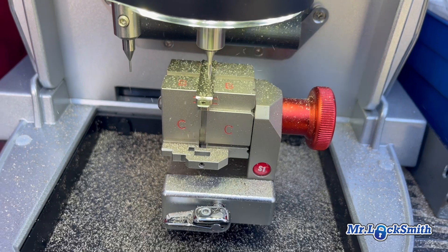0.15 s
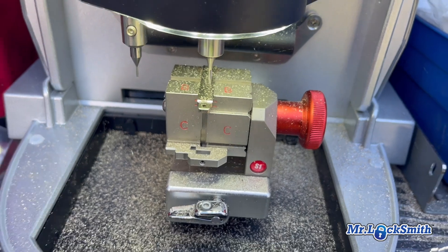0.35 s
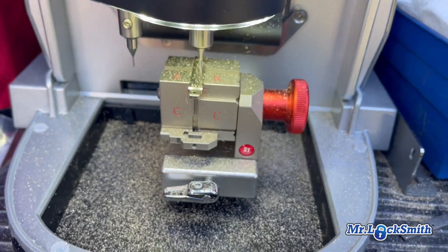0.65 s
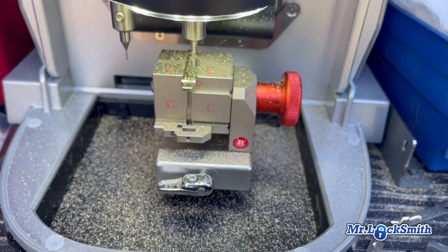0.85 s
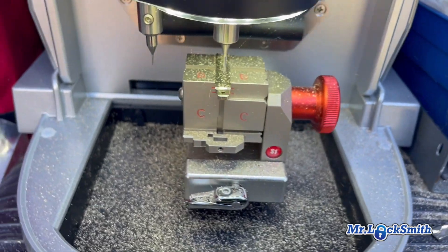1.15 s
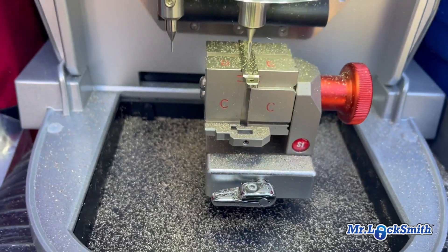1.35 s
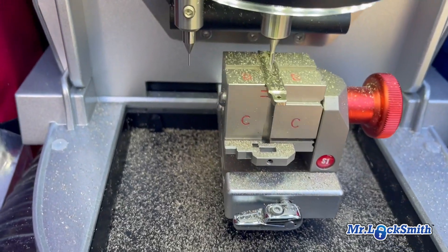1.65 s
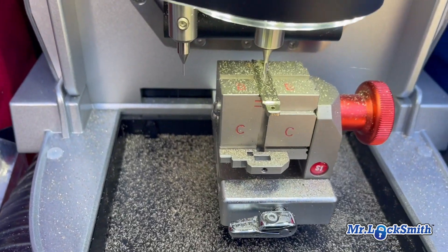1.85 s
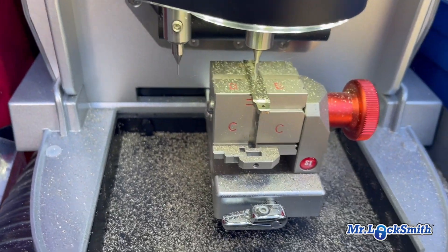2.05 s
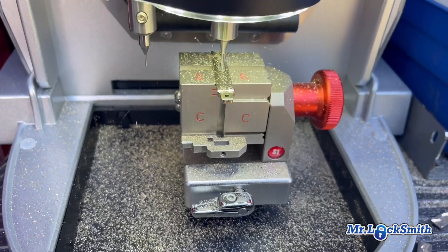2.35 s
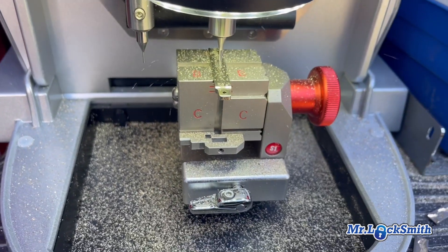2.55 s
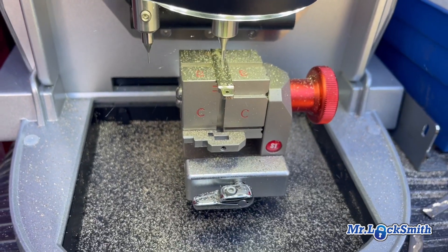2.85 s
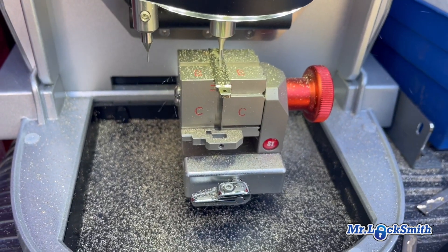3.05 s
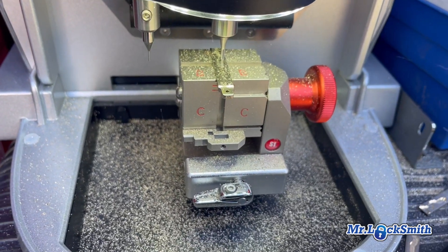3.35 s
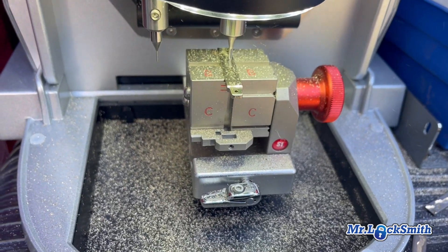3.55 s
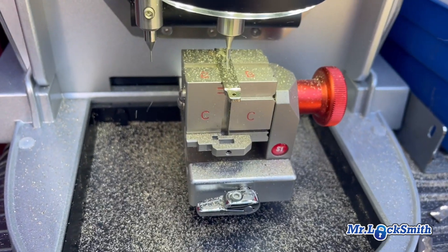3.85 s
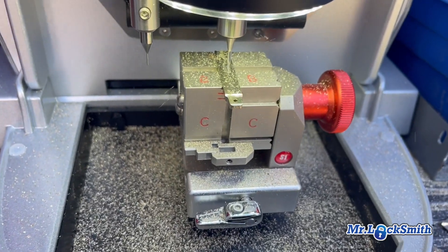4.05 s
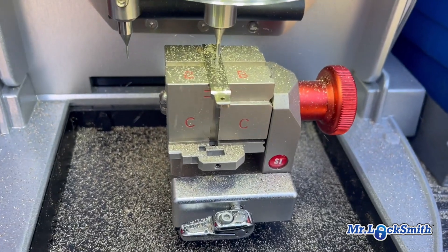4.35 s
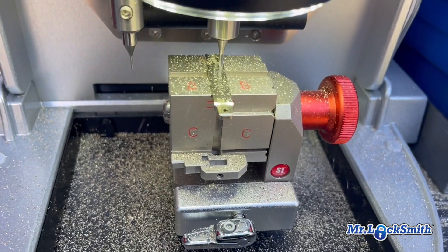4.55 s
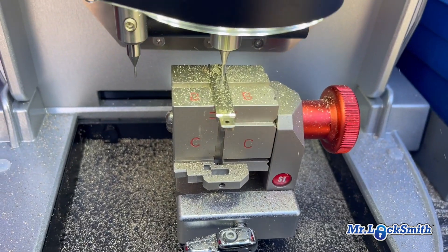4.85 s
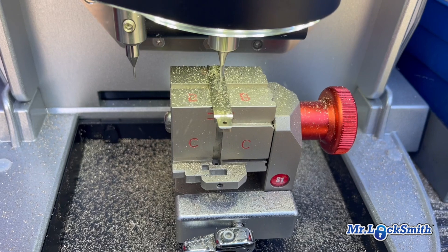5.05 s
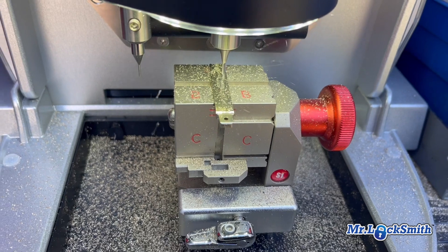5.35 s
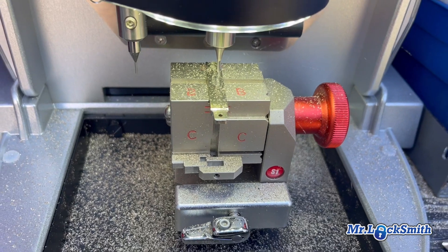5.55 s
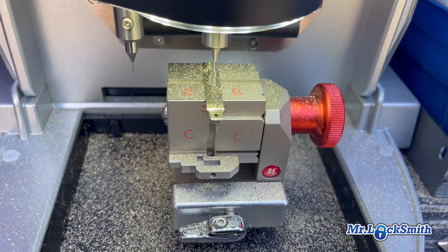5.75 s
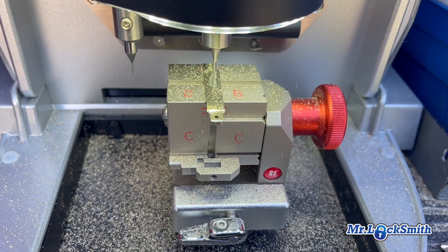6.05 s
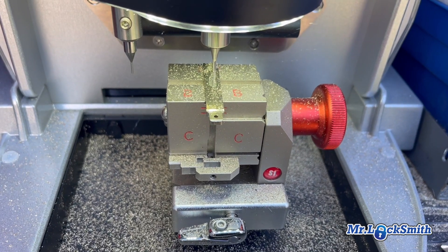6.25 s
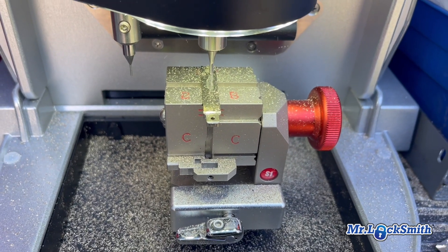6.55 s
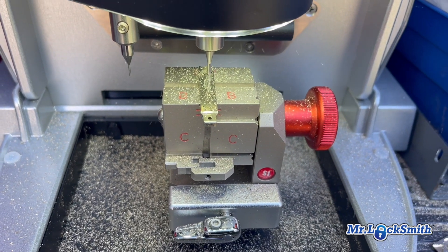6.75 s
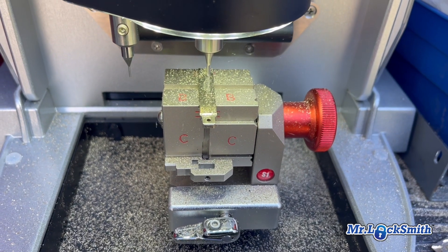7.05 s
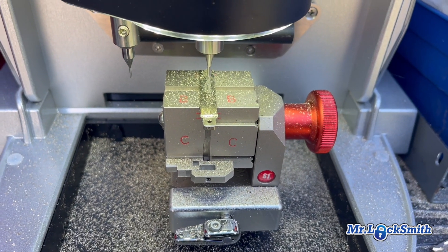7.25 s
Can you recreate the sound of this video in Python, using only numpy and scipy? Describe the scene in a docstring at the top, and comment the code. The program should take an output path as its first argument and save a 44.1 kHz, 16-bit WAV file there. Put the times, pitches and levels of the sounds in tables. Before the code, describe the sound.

A small milling machine whines steadily while its feed motors hum in changing pitches, cutting a brass key with a fine hiss of chips.

```python
"""Inside the plastic housing of a small milling machine a brass key is cut, heard by two hand-held microphones.
The spindle sings in multiples of its turning rate. The stepper motors that feed the clamp hum at a pitch set by
each move, and their shake mixes with the cutter into sum and difference tones. Chips hiss, swelling once and
more weakly twice a turn, over a rush of noise in the housing. A fan hums low and the carriage knocks."""
import sys
import numpy as np
from scipy import signal
from scipy.fft import rfft, irfft, next_fast_len
from scipy.io import wavfile
from scipy.ndimage import uniform_filter1d, map_coordinates

SR = 44100
rng = np.random.default_rng(int(sys.argv[2]) if len(sys.argv) > 2 else 0)


def materialize(psi):
    """Save the field psi as 16-bit PCM at rate SR to the path in sys.argv[1].

    A 1-D psi becomes a single channel; in a 2-D psi each row is a channel.
    """
    bounded = np.clip(np.atleast_2d(psi).T, -1, 1)
    quanta = np.round(bounded * 32767).astype(np.int16)
    wavfile.write(sys.argv[1], SR, quanta)


N = 326781

# feed moves: [start t/s, kind: 0 fast, 1 slow, 2 middle]
MOVES = [(0.05, 0), (0.52, 0), (1.049, 0), (1.55, 0), (2.04, 1), (2.55, 1), (3.03, 0), (3.67, 2),
         (4.579, 0), (5.45, 1), (6.0, 1), (6.432, 0), (7.07, 1)]
# step cycle rate of fast, slow and middle moves: [f/Hz]
STEP_HZ = [83.97, 66.73, 79.45]
# load of each move, in the order of MOVES: [hum level/dB, low mixed tones level/dB, high mixed tones level/dB]
MOVE_LOAD = [(-1, -0.5, -0.5), (-2, -0.5, -2), (-1, -0.5, -.5), (0, -2.5, -3.5), (-0.5, 0.5, -1),
             (0, 1.5, 3.5), (-0.5, -1.5, 0.5), (-0.5, 2, -1.5), (.5, 0, 1.5), (0, 1, 1), (0, 0.5, 0),
             (0, -2, 1.5), (.5, 2, 0.5)]
# chips build up along a move and drop as it turns: [t/s, chip level/dB, lowest range over it level/dB]
CHIP_LEVELS = [(0, 2.5, 1.5), (.5, -0.5, 2.5), (1.55, -1, 1), (1.96, -4.5, 2), (2.17, -1, -0.5),
               (2.9, 5.5, -2), (3.0, 4.5, -2), (3.14, -1.5, 1.5), (3.55, -2, 1), (4.46, 4.5, -1),
               (4.75, 1.5, 1), (5.41, 2, 0.5), (5.45, -1, 2), (6.38, -3.5, 5.5), (6.44, 0.5, 2.5),
               (7.04, 1.5, 0), (7.09, -1, 3), (7.41, -1, 4)]


def amp(db):
    """Gain of a level in dB."""
    return 10 ** (np.asarray(db) / 20)


def unit(x):
    """Scaled to rms 1."""
    return x / np.sqrt(np.mean(x ** 2) + 1e-20)


def along(points, hz):
    """Value at hz, read from (Hz, value) points on a log frequency axis."""
    f, v = np.transpose(points)
    return np.interp(np.log(np.abs(hz) + 1), np.log(f + 1), v)


def curves(rows):
    """One value per sample for each column after the time."""
    times, *columns = np.transpose(rows)
    return [np.interp(np.arange(N) / SR, times, column) for column in columns]


def wobble(rate):
    """A random curve of straight segments, rate knots a second."""
    knots = rng.standard_normal(int(N * rate / SR) + 4)
    return map_coordinates(knots, [np.arange(N) * rate / SR], order=1)


def filtered(x, response):
    """x shaped by a response of frequency."""
    size = next_fast_len(N + 8192)
    spectrum = rfft(x, size) * response(np.fft.rfftfreq(size, 1 / SR))
    return irfft(spectrum, size)[..., :N]


def left_right(mid, side):
    """Two channels from their mean and half difference."""
    return np.array([mid + side, mid - side])


def panned(pair, pan_db):
    """Shifted towards the left by pan_db, with the two gains averaging 1."""
    gain = amp(np.array([pan_db / 2, -pan_db / 2]))
    return pair * gain / gain.mean(0)


def turning(hz):
    """Angle of a shaft that turns at hz."""
    return 2 * np.pi * np.cumsum(hz) / SR


def lag(angle):
    """The housing sets higher tones back more in phase; tones that lie close keep step and beat together."""
    mean_khz = angle[-1] / (2 * np.pi * N / SR) / 1000
    return angle - 13 * mean_khz ** 2


def gait(move):
    """0, 1 or 2 for a fast, slow or middle move."""
    return np.transpose(MOVES)[1].astype(int)[move]


def feed():
    """Step cycle angle, the move at each sample, and a gain that sags while the motor changes speed."""
    starts = np.transpose(MOVES)[0]
    move = np.clip(np.searchsorted(starts, np.arange(N) / SR) - 1, 0, None)
    # the motor takes 33 ms to reach a new speed
    speed = uniform_filter1d(np.array(STEP_HZ)[gait(move)], int(0.033 * SR))
    change = np.abs(np.gradient(speed)) * SR  # Hz per second
    sag = amp(-.02 * uniform_filter1d(change, size=400))
    start_angle = 0.081  # radians
    return turning(speed) + start_angle, move, sag


def spindle(shaft, shake):
    """Each multiple reaches the two microphones by its own path; the feed shakes the weak ones."""
    # the loudest multiples drift as the clamp travels and step when a move turns:
    # [t/s, multiples 1, 3, 4, 5, 6 level/dB]
    loudest = [(0, -32, -34, -34, -24, -31), (.5, -28, -33.5, -29.5, -23, -30),
               (.7, -34, -34.5, -29.5, -31.5, -32.5), (1.2, -40, -34, -27.5, -27.5, -28.5),
               (1.65, -45, -32.5, -27.5, -35, -30), (2.0, -35, -32.5, -30, -43, -31),
               (2.3, -36, -30.5, -29.5, -29.5, -28), (2.95, -30, -32, -26.5, -32.5, -26),
               (3.1, -31, -36, -30, -30, -27.5), (3.62, -45, -34.5, -34, -30, -30.5),
               (3.8, -32, -31, -35, -31.5, -26), (4.4, -48, -34.5, -34.5, -27, -23),
               (4.55, -29.5, -35, -23.5, -30, -23), (5.38, -27.5, -34.5, -24, -27.5, -24),
               (5.5, -26, -43, -27, -27, -27), (6.1, -26.5, -42.5, -27.5, -31, -25.5),
               (6.38, -29.5, -42, -26, -28.5, -33), (6.48, -30, -39, -23, -31, -23),
               (7.03, -29.5, -33.5, -27.5, -30.5, -23.5), (7.12, -26, -46, -26, -30, -25),
               (7.41, -28, -41, -27, -31.5, -25)]
    # slower changes: [t/s, multiples 2, 7, 9, 10, 12, 17 level/dB]
    slower = [(0, -41.5, -35.5, -41.5, -62, -51, -44.5), (1.0, -43, -42, -41.5, -51, -55, -57),
              (1.5, -40.5, -43, -39, -59, -49, -54), (2.05, -44, -38, -52, -71, -51, -67),
              (2.6, -49.5, -37.5, -42, -47, -53, -54), (3.45, -43, -39, -52, -43, -67, -62),
              (4.0, -46, -43, -41, -44.5, -49, -49.5), (4.6, -41, -35, -45, -41.5, -59, -49),
              (5.3, -41.5, -36.5, -44, -40.5, -68.5, -50.5), (6.2, -41, -41.5, -45.5, -44.5, -61, -48),
              (7.0, -41.5, -36.5, -45, -39.5, -61, -50), (7.41, -41.5, -38, -42, -47, -50, -47)]
    # multiples of the turning rate, in the order of those columns: [multiple]
    strong = [1, 3, 4, 5, 6, 2, 7, 9, 10, 12, 17]
    # how wide each strong multiple sounds: [side minus mid level/dB]
    strong_side_db = [-19, -13.5, -16.5, -14, -23.5, -23, -33.5, -3, -4.5, -10, -2.5]
    # place of two strong multiples: [t/s, left minus right of multiple 4 level/dB, of multiple 5 level/dB]
    places = [(0, -13, -1), (.25, -10, -1), (1.25, -14, 0), (1.55, 4, -6), (2.0, 6, -5), (2.3, -2, -6),
              (2.75, 1, -11), (3.6, -6, -11), (4.2, 12, -6), (4.5, 2.5, -8), (5.4, 3, -3.5),
              (7.41, 4.5, -5)]
    # brief dips of one multiple: [centre t/s, multiple, half length t/s, depth level/dB]
    fades = [(0.365, 5, 0.04, 11), (1.5, 4, 0.17, 35), (1.982, 6, 0.039, 3), (2.09, 4, 0.061, 9),
             (2.38, 1, .03, 18), (6.28, 3, 0.089, 2), (6.317, 4, 0.058, 32), (6.406, 1, 0.018, 4),
             (6.574, 4, 0.089, 17)]
    # weak multiples, which come and go: [multiple, mid level/dB, side level/dB]
    weak = [(8, -52, -74), (11, -53, -55), (13, -57, -50), (14, -56.5, -48), (18, -56.5, -52.5),
            (19, -59.5, -63), (20, -72, -60), (21, -64.5, -62), (22, -74, -56), (24, -66.5, -62),
            (25, -55.5, -67), (27, -58, -71), (28, -56, -73), (29, -72, -73.5), (31, -71.5, -66),
            (32, -58.5, -58.5), (36, -73, -58.5), (47, -70, -64.5)]
    weak_growth = 0.2  # dB gained in the mid per dB of chip level

    t = np.arange(N) / SR
    chips_db = curves(CHIP_LEVELS)[0]
    levels = curves(loudest) + curves(slower)
    pans = dict(zip([4, 5], curves(places)))
    out = np.zeros((2, N))
    for k, db, side_db in zip(strong, levels, strong_side_db):
        angle = lag(k * shaft) + 0.02 * wobble(40)
        pair = left_right(np.sin(angle), -amp(side_db) * np.cos(angle))
        dips_db = sum(depth_db * np.exp(-((t - centre) / half) ** 2)
                      for centre, which, half, depth_db in fades if round(which) == k)
        flutter_db = .5 * wobble(12)
        out += amp(db - dips_db + flutter_db) * panned(pair, pans.get(k, 0 * db))
    for k, mid_db, side_db in weak:
        angle = lag(round(k) * shaft) + 0.058 * wobble(30)
        flutter_db = 2.2 * wobble(2.614) + 2.7 * wobble(8)
        mid = amp(mid_db + weak_growth * chips_db + flutter_db) * np.sin(angle)
        side = amp(side_db + 1.8 * wobble(2.6)) * np.cos(angle)
        out += left_right(mid, side) * (1 + 0.29 * shake)
    return np.sqrt(2) * out  # table levels are rms


def stepper(steps, move, sag):
    """The motor hums in multiples of its step cycle, at the strengths of each kind of move."""
    # hum, one row each for fast, slow and middle moves: [step multiples 2 to 7 level/dB]
    hum_db = [(-33.5, -20.5, -38.5, -52, -59, -58), (-47.5, -26, -27.5, -40.5, -48, -51),
              (-44.5, -18.5, -33.5, -39.5, -47, -63)]
    kind = gait(move)
    load_db = np.transpose(MOVE_LOAD)[0][move]
    hum = np.zeros(N)
    for k, db in enumerate(np.transpose(hum_db), start=2):
        level = uniform_filter1d(amp(db)[kind], size=900)
        hum += level * np.sin(lag(k * steps) - 2.1)
    # the driver's small steps whine far above the hum
    hum += amp(-58.0 + 1.5 * wobble(9.5)) * np.sin(48 * steps)
    load_gain = amp(uniform_filter1d(load_db, size=4000) + 0.16 * wobble(8.8))
    return np.sqrt(2) * load_gain * sag * hum


def mixing(shaft, steps, move):
    """The clamp shakes against the flutes: tones at sums and differences of both rates, coloured by the housing."""
    # mixed tones: [spindle multiple, step multiple added to it]
    pairs = [(k, m) for k, ms in [(1, [1, 2, 3, 4, 5]), (2, [-3, 1, 2, 3, 4]),
             (3, [-3, -2, -1, 2, 3, 4, 5, 6]), (4, [-4, -3, -1, 1, 2, 3, 4, 5, 6]),
             (5, [-3, -2, 1, 2, 3, 4]), (6, [-3, -2, -1, 1, 3]), (7, [-5, -4, -3, -2]), (8, [-5, 2, 3]),
             (9, [-4, 2, 3]), (10, [-5, 2, 3]), (11, [-3])] for m in ms]
    # shake of the clamp, one row each for fast, slow and middle moves: [step multiples 1 to 6 level/dB]
    clamp_db = [(0.61, 6, 3.37, -4, 5.5, -2), (-0.46, -1, 1.27, 3, -8.5, -6), (-2.2, 0.5, 2.8, -8, -14, 4)]
    # how loudly the housing passes a mixed tone: [f/Hz, level/dB]
    housing = [(200, -36.5), (310, -65), (480, -47.5), (560, -56.5), (600, -55), (670, -50.5), (705, -59),
               (730, -53), (790, -50.5), (856, -47), (928, -52), (945, -47.5), (1025, -55), (1088, -38.5),
               (1125, -51.5), (1156, -57), (1175, -44.5), (1215, -48.5), (1255, -40.5), (1330, -53.5),
               (1372, -54.5), (1390, -36), (1410, -42), (1455, -44), (1520, -52), (1800, -51.5),
               (2020, -49.5), (2300, -54.5), (2600, -59.5)]

    kinds = gait(np.arange(len(MOVES)))
    step_hz = np.array(STEP_HZ)[kinds]
    low_db, high_db = np.transpose(MOVE_LOAD)[1:]
    turn_hz = shaft[-1] / (2 * np.pi * N / SR)
    shake_db = np.array(clamp_db)[kinds]
    out = np.zeros(N)
    for k, m in pairs:
        hz = k * turn_hz + m * step_hz  # one pitch per move
        difference_db = -5 * (m < 0)  # difference tones lie under sum tones
        load_db = np.where(hz < 1250, low_db, high_db)
        db = along(housing, hz) + shake_db[:, abs(m) - 1] + difference_db + load_db
        # only the tones of the strongest step multiple stay near step with their neighbours
        if abs(m) == 3:
            drift = rng.normal(0, .4) + .12 * wobble(14)
        else:
            drift = rng.normal(0, 3) + .3 * wobble(14)
        level = uniform_filter1d(amp(db)[move], size=900) * amp(.8 * wobble(4))
        out += level * np.sin(lag(k * shaft + m * steps) + drift)
    return np.sqrt(2) * out


def patchy(patch_db):
    """Two noises with patches of random gain over time and frequency, spread by patch_db rms."""
    z = signal.stft(rng.standard_normal((2, N)), nperseg=512)[2]
    across_pitch = uniform_filter1d(rng.standard_normal(z.shape), size=3, axis=1)
    field = uniform_filter1d(across_pitch, size=14, axis=2)
    return signal.istft(z * amp(patch_db * unit(field)), nperseg=512)[1][:, :N]


def noise(shaft, shake):
    """A rush in the housing, and chips torn off in bursts once and twice a turn."""
    # colour of the rush before its overall gain, mid and side: [f/Hz, relative level/dB]
    rush_mid, rush_side = [(25, -53), (60, -24.5), (110, -31), (220, -18.5), (450, -34), (560, -30.5),
                           (780, -27), (900, -18), (1000, -27), (1200, -27), (1400, -19.5), (1550, -26),
                           (2200, -34.5), (2800, -42.5), (3500, -92)], [(60, -58), (150, -54), (250, -28), (450, -29.5), (800, -31),
                                              (1200, -31), (1500, -45), (1950, -54), (2200, -49),
                                              (3000, -44), (3500, -71)]
    # colour of the chips before their overall gain, mid and side: [f/Hz, relative level/dB]
    chips_mid, chips_side = [(2000, -15), (2600, -1), (2850, -4.5), (3200, -1), (4100, -0.5), (4900, -9),
                             (5800, 3.5), (6800, 0.5), (8000, -8), (8700, -70), (9700, -27), (10500, -8),
                             (12000, -11.5), (13500, -15.5), (15000, -16.5)], [(2000, -25), (2800, -9), (5000, -2.5), (5600, -16),
                                                (6300, -18), (7000, -8), (8500, -1), (11000, -10.5),
                                                (12000, -24.5), (13800, -25.5), (15000, -8)]

    chips_db, lower_db = curves(CHIP_LEVELS)
    rush = filtered(patchy(patch_db=1), lambda hz: amp([along(rush_mid, hz), along(rush_side, hz)]))
    bursts = 1 + .22 * np.sin(shaft) + .1 * np.sin(2 * shaft + 1) + .04 * shake
    torn = patchy(patch_db=3.0) * bursts * amp(chips_db + 0.2 * wobble(13))
    chips = filtered(torn, lambda hz: amp([along(chips_mid, hz), along(chips_side, hz)]))
    lower = filtered(chips, lambda hz: hz < 5200)
    upper = filtered(chips, lambda hz: hz > 9000)
    middle = chips - lower - upper
    # the highest range swings less than the chip level: 0.65 dB per dB
    upper_db = 2.5 - 0.35 * chips_db
    chips = amp(lower_db) * lower + middle + amp(upper_db) * upper
    return amp(2.0) * left_right(*rush) + amp(-38.5) * left_right(*chips)


def fan():
    """An unsteady low hum: one tone whose pitch and level wander."""
    # course of the hum, before its wander: [t/s, f/Hz, level/dB]
    course = [(0, 96.3, -40), (.45, 96.5, -48), (.6, 104, -62), (4, 105, -48), (4.3, 106, -45),
              (5.2, 105.5, -44.5), (5.5, 105.7, -38.5), (6.1, 105.7, -44), (6.9, 105.8, -38.5),
              (7.1, 106.4, -40), (7.25, 103.4, -57), (7.41, 104, -65)]
    hz, db = curves(course)
    return np.sqrt(2) * amp(db + 2.0 * wobble(9.0)) * np.sin(turning(hz + 1.46 * wobble(8)))


def knocks():
    """Knocks of the carriage: short dull rings of two tones with a soft start."""
    # one row a knock: [t/s, lower tone level before the soft start/dB, ring f/Hz, 60 dB decay t/s]
    hits = [(0.513, -11.5, 338, 0.069), (0.533, -17.5, 372, 0.089), (1.053, -29.5, 150, 0.074),
            (1.551, -34, 298, 0.057), (2.031, -25, 334, 0.073), (3.012, -11.5, 252, 0.07)]
    out = np.zeros(N + SR)
    t = np.arange(SR // 4) / SR
    for start, db, hz, t60 in hits:
        ring = np.sin(2 * np.pi * hz * t) + 0.38 * np.sin(2 * np.pi * 1.3 * hz * t)
        soft_start = 1 - np.exp(-t / 0.0018)
        out[round(start * SR):][:len(t)] += amp(db - 60 * t / t60) * soft_start * ring
    return out[:N]


def spread(x):
    """The housing sends a mono sound unevenly to the two microphones: a side turned by a quarter cycle."""
    # width of the sound: [f/Hz, side minus mid level/dB]
    width = [(60, -25), (150, -27), (380, -13), (950, -4.5), (2380, -33.5), (5960, 0), (15000, 13)]
    # place of the sound: [t/s, left minus right level/dB]
    place = [(0.0, -1), (1.53, -3), (2.19, -0.5), (6.95, 0.5), (7.41, -1)]
    side = filtered(x, lambda hz: 1j * amp(along(width, hz)))
    return panned(left_right(x, side), curves(place)[0])


def scene():
    """Spindle, feed, their mixture, noise, fan and knocks."""
    # spindle speed, higher when the cut is light: [t/s, turning rate f/Hz]
    speed = [(0, 230.0), (.8, 230.02), (1.1, 229.75), (2.0, 231.2), (3.0, 229.52), (3.6, 230.56),
             (4.0, 230.56), (4.2, 230.1), (5.4, 230.05), (6.4, 230.7), (7.41, 230.15)]
    shaft = turning(curves(speed)[0] + .06 * wobble(25))
    steps, move, sag = feed()
    shake = np.sin(3 * steps) + .5 * np.sin(2 * steps)
    body = stepper(steps, move, sag) + mixing(shaft, steps, move) + fan() + knocks()
    return spindle(shaft, shake) + spread(body) + noise(shaft, shake)


def record(dry):
    """The microphones' signal keeps nothing above its band limit."""
    top_hz = 15570
    return filtered(dry, lambda hz: hz < top_hz)


dry = scene()
out = record(dry)
materialize(out)
```